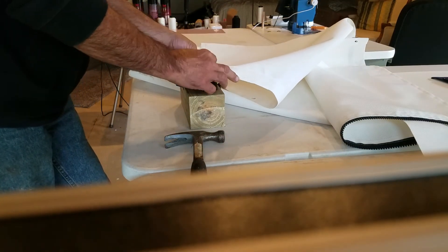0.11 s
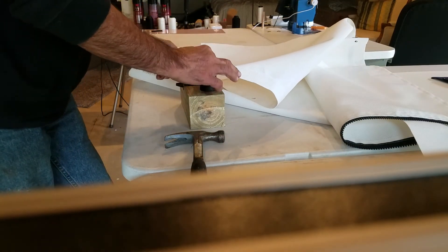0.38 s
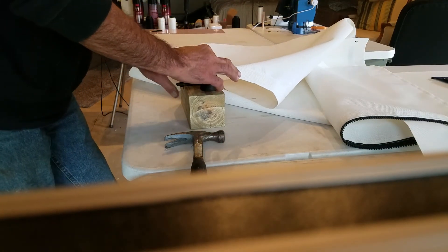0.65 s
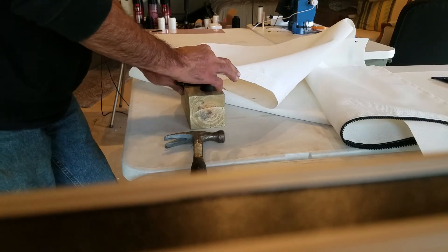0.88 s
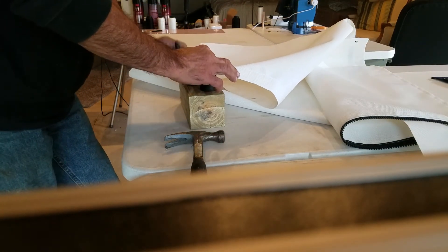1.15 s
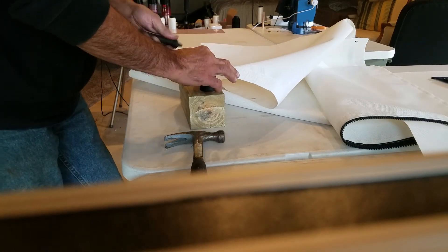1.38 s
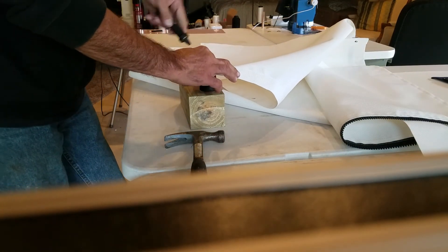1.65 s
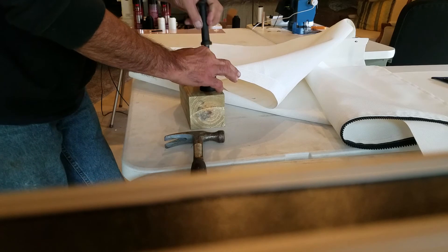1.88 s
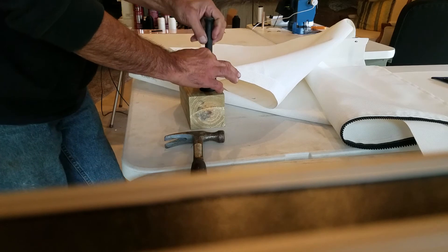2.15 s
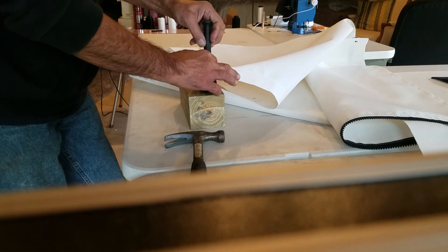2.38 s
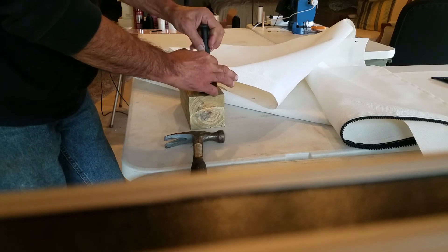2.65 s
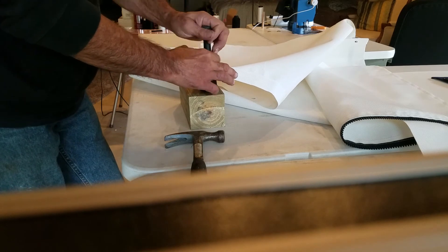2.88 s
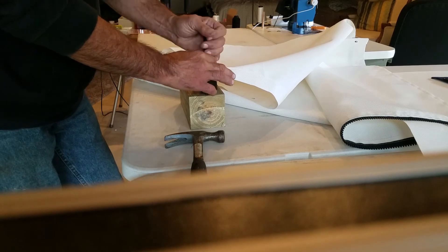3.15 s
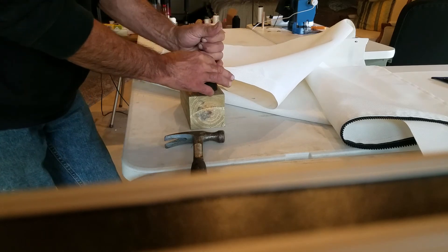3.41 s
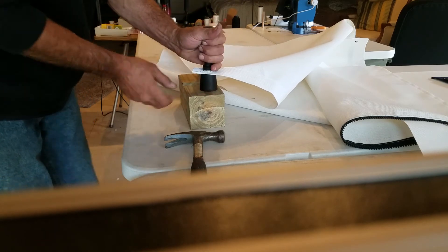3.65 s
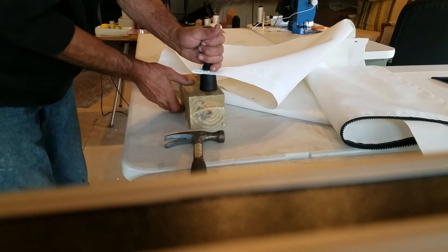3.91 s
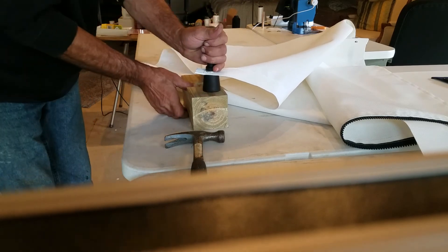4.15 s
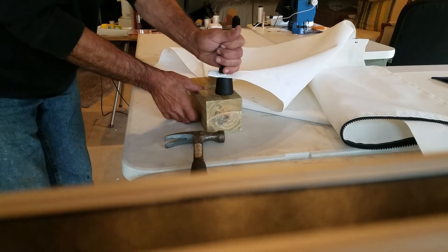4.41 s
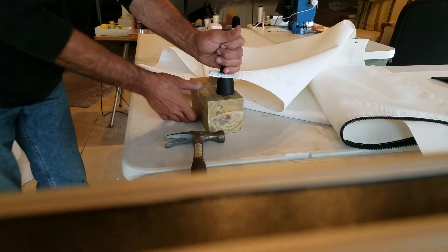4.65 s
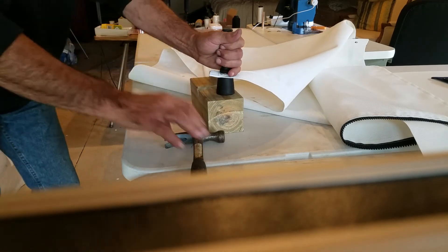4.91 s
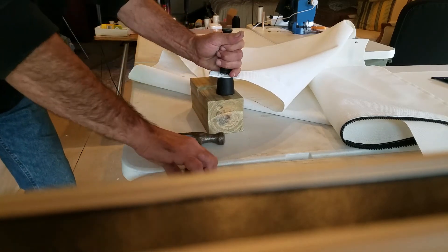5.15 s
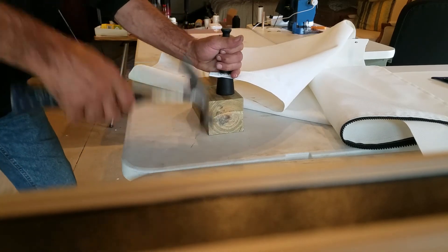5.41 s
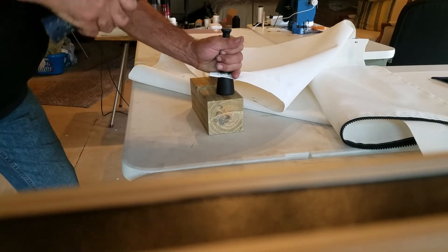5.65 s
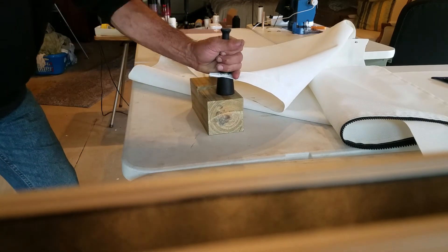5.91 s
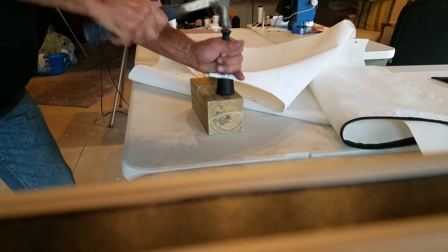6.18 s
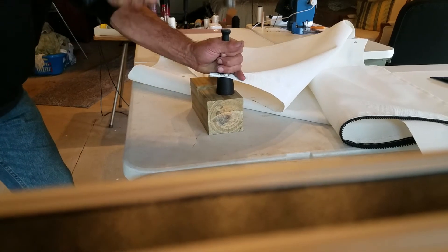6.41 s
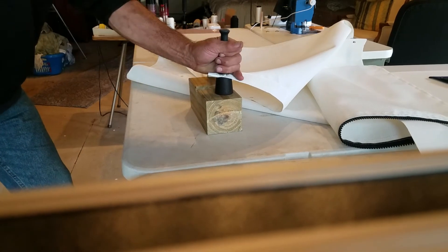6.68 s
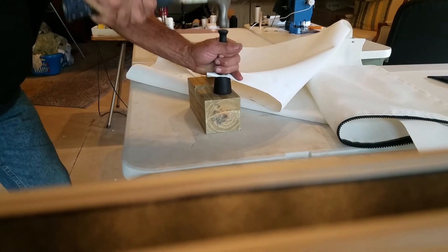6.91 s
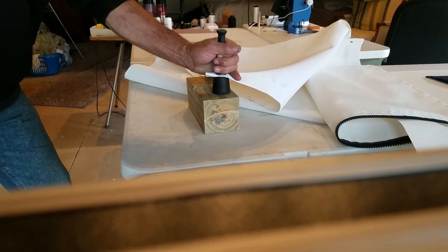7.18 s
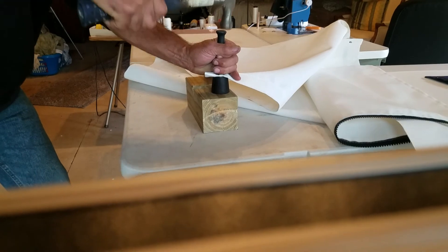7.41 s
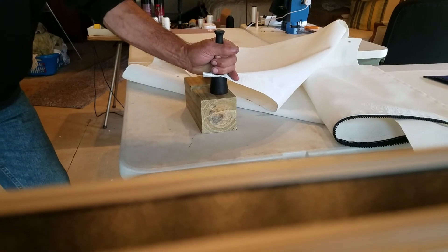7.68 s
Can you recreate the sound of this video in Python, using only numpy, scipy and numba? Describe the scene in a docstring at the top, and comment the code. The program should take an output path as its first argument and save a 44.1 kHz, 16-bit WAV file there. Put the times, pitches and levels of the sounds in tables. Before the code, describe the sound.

Faint hiss and small dull taps first, with gentle cloth rustling; then fuller wooden knocks with tiny metallic ticks as tools are placed on a block. Scraping, a brief squeak and hammer-grabbing clatter follow. A near-silent gap, then three explosive hammer hits on steel: bright ping, sharp crack, block bouncing and table rattling. The first overloads the nearby microphone; the next two have less steel ring. Short diffuse indoor reverberation.

```python
"""A hammer strikes a steel setter three times: damped steel modes ring, and lumpy noise bursts and wood modes
follow as the block slams and rattles on the table. Before that, hands set a grommet die on the wooden block,
lower the setter, slide the block and pick up the hammer: taps and catches wake block modes, rough noise makes
the rubbing, the table's shudder and the rustling, gliding tones squeak. A diffuse tail is the room, steady
noise its air. The recorder clips the first blow and turns its gain down."""
import sys
import numpy as np
from scipy import signal
from scipy.fft import rfft, irfft
from scipy.io import wavfile
from numba import njit

SR = 44100
rng = np.random.default_rng(int(sys.argv[2]) if len(sys.argv) > 2 else 0)


def waveform_to_disk(signal):
    """Save audio, clipped to [-1, 1], as 16-bit WAV at the path in sys.argv[1]."""
    frames = np.transpose(np.atleast_2d(signal))
    scaled = np.clip(frames, -1, 1) * 32767
    samples = np.round(scaled).astype(np.int16)
    wavfile.write(sys.argv[1], SR, samples)


def undo_db(level):
    """Turn decibels back into plain size, where 20 dB means ten times bigger."""
    steps = np.asarray(level, float) / 20
    return 10 ** steps


N = 343980
T = np.arange(N) / SR  # s

# Hammer head and setter modes. Each row: frequency in Hz, relative level in dB, t60 in seconds.
STEEL_MODES = [(10135, 1, 0.037), (5979, -10, .2), (5449, -19, .35), (8888, -12, 0.06), (7340, -5, 0.026),
               (1541, -7, 0.09), (5100, -11, .06), (1950, -12, .07)]
# Block and table top modes, as slammed. Each row: frequency in Hz, relative level in dB, t60 in seconds.
BLOCK_MODES = [(147.5, -8, 0.31), (212, -5.5, 0.12), (280, -7, .15), (357.5, 9, 0.076), (469.5, 4, 0.097),
               (562, -1, 0.14), (764.5, 6.5, 0.081), (819, 3, 0.087), (995, 2, 0.13), (1100, 0, .1),
               (1234, -1, 0.17), (1550, -13, 0.066), (1851.9, -10, .06), (2520, 2, 0.034)]
# Frame modes. Each row: frequency in Hz, relative level in dB, t60 in seconds.
FRAME_MODES = [(1125, -15, 1.2), (1981, -10, .8), (2500, -2, .45), (3564, -8, 1.4), (5452, 2, .45),
               (5982, 2, .45)]
# How hard each strike shakes the frame: peak level in dB.
FRAME_PEAK_DB = [-34, -31, -29]
# Spectrum of the rattle on the table. Each row: frequency in Hz, relative level in dB.
RATTLE_SPECTRUM = [(35, -46), (60, -38.5), (107, -16), (142, -8), (201, -10.5), (350, 0.5), (497, -7.5),
                   (545, -5), (930, -9), (997, -1.5), (1450, -10), (2000, -11.5), (3920, -19),
                   (7690, -12.5), (11500, -32), (15400, -38)]
# Hammer meets setter. Each row: start in seconds, steel ring in dB, crack in dB, block slam in dB,
# rattle t60 in seconds.
STRIKES = [(6.180, 5.5, -2, -8.5, 0.1), (6.758, -15, -20, -24.5, 0.082), (7.333, -15.5, -15.5, -27, 0.15)]
# Block bounces back onto the table. Each row: start in seconds, steel ring in dB, crack in dB,
# block slam in dB, rattle t60 in seconds.
BOUNCES = [(6.192, -24, -6, -10, 0.28), (6.211, -17.5, -9.5, -17, .2), (6.230, -29.5, -12.5, -10.5, 0.22),
           (6.770, -25.5, -8.5, -15, 0.21), (6.786, -17, -11.5, -7.5, 0.33), (6.806, -23, -12, -12.5, 0.39),
           (7.352, -18, -7.5, -10.5, 0.24), (7.363, -30, -8, -9.5, 0.38), (7.380, -35, -9.5, -10.5, 0.36)]
# Tool and block set down, tapped, or catching roughly as they drag. Each row: start in seconds,
# wood peak in dB, pitch in Hz, click in dB against the wood, bright tick in dB against the wood.
KNOCKS = [(0.255, -48, 556, -0.5, -17), (0.528, -62, 390, -7.5, -2), (0.724, -62, 401, -6, 1),
          (0.932, -55.5, 393, -10, -3), (1.083, -44, 450, -16, -22), (1.456, -63.5, 377, 4.5, 20.5),
          (1.467, -67, 229, -5, 25), (2.236, -33, 750, -35, -25.5), (2.250, -42, 260, -40, -22),
          (2.269, -44, 780, -28, -24.5), (2.324, -32.5, 807, -22, -16.5), (2.340, -32, 210, -33, -22),
          (2.355, -30, 790, -23, -27.5), (2.389, -35, 225, -27, -27), (2.555, -44.5, 449, -28, -14),
          (2.593, -42.5, 315, -29, -31), (2.81, -46, 750, -31, -20), (2.828, -44, 220, -25, -21),
          (2.962, -44.5, 225, -24, -22), (3.26, -48.5, 487, 2.5, -5.5), (3.770, -31.5, 410, -10.5, -14.5),
          (3.808, -36.5, 395, -9.5, -12.5), (3.968, -29, 490, -5, -10.5), (4.618, -44.5, 513, 3, -10.5),
          (4.664, -47, 2300, -2, -9), (5.046, -29.5, 840, -13, -19.5), (5.078, -35.5, 476, -5.5, -9.5),
          (5.256, -33, 477, -10, -18), (5.281, -29, 536, -6, -8), (5.299, -30.5, 455, -3, -9.5),
          (5.536, -66, 280, -11, 11.5), (5.556, -65, 686, -11, 7.5), (5.629, -65.5, 369, -6.5, 1),
          (5.73, -59.5, 242, -3, -3)]
# Click spectrum of a knock. Each row: frequency in Hz, relative level in dB.
CLICK_SPECTRUM = [(200, -50), (600, -10.5), (1300, 2.5), (2600, -5.5), (4500, -19.5), (12000, -41.5)]
# Small metal parts that ring faintly. Each row: start in seconds, frequency in Hz, peak in dB, t60 in seconds.
TINKS = [(0.932, 2440, -68, .5), (1.075, 5103, -66, 0.32), (1.641, 5450, -77, 1), (2.237, 5400, -72, 0.102),
         (2.325, 5400, -56.5, 0.093), (2.332, 2960, -57, 0.33), (4.62, 2100, -56, 0.15),
         (4.655, 2695, -64, 0.15)]
# Spectra of thud, rumble, scrape and hiss, in turn. Each row: frequency in Hz, relative level in dB.
RUB_SPECTRA = [
    [(30, -23.5), (70, -1), (120, 8), (220, -18), (600, -57.5)],
    [(100, -24.5), (200, -7), (400, 2), (650, -8.5), (1200, -20.5), (3000, -63.5)],
    [(100, -49.5), (350, -19), (700, 5), (1500, 2), (2600, -0.5), (4500, -17), (12000, -45)],
    [(500, -47.5), (1800, -14), (3500, -3), (6000, -3), (7600, 6.5), (9500, -6), (12000, -16), (15000, -13)],
]
# Rubbing over wood, and the table's shudder dying away after a tap. Each row: loudest moment in seconds,
# table rumble in dB, thud in dB against it, scrape in dB against it, rise in seconds per 20 dB.
WOOD_SWELLS = [(.544, -76, -18, 0, 0.3), (.654, -69.5, -7, -16, .3), (.80, -82.5, 1, 1, .3),
               (.872, -70, -12, -4, 0.086), (1.0, -69, -3, -3, 0.24), (1.062, -47.5, -15.5, -14.5, .053),
               (2.42, -57, -11, -13, .03), (2.598, -56.5, -18, -17.5, .3),
               (2.874, -62.5, -1.5, -17.5, 0.029), (3.02, -65, -3.5, -14, .05),
               (3.3, -62.5, -24, -5.5, .03), (3.45, -67, -17, -2.5, .3), (3.607, -61.5, -29, 2, 0.185),
               (3.73, -72, -8.5, -5, 0.12), (3.839, -49.5, -26, -3, 0.049), (4.02, -52.5, -15, -2, .04),
               (4.19, -63, -17, 6.5, 0.25), (4.30, -52, -9, 3, .3), (4.44, -57.5, -6.5, 5, .5),
               (4.699, -61.5, -23, -3.5, 0.088), (4.9, -72, -11, 3, 0.53), (5.031, -61.5, 6, -5, .06),
               (5.1, -51, -15, 0.5, 0.053), (5.19, -48, -6.5, -2, .15), (5.279, -40.5, -10, 0.5, .09),
               (5.738, -70.5, -7, -2.5, 0.034)]
# Fabric rustles. Each row: loudest moment in seconds, hiss in dB, rise and fall in seconds per 20 dB.
RUSTLES = [(.544, -72.5, 0.17, 0.15), (.87, -70.5, 0.35, .9), (1.062, -63.5, 0.174, 0.13),
           (1.38, -74.5, 0.28, 0.69), (1.55, -71, 0.058, .06), (1.74, -79, 1, .8), (2.42, -78, 0.036, 0.15),
           (2.598, -72, 0.27, 0.16), (2.785, -69.5, 0.1, 0.19), (3.1, -70.5, 0.13, 0.17),
           (3.35, -73.5, 0.39, .6), (3.606, -62.5, 0.28, 0.13), (3.9, -62, 0.23, 0.46),
           (4.29, -54.5, 0.61, 0.42), (4.7, -68, 0.12, 0.072), (4.95, -68.5, 1.1, 0.1),
           (5.09, -55.5, 0.1, 0.15), (5.298, -40, 0.079, 0.085), (5.55, -71, .5, .8), (5.9, -81, .9, 0.96)]
# Sliding parts squeak. Each row: start in seconds, length in seconds, first Hz, last Hz,
# level in dB ahead of the stutter.
SQUEAKS = [(2.55, 0.12, 4400, 4700, -74), (2.8, .12, 4200, 3980, -77), (2.96, .12, 4280, 4520, -80),
           (4.372, .13, 1530, 1450, -47.5)]
# Air and hiss spectrum. Each row: frequency in Hz, relative level in dB per Hz.
AIR_SPECTRUM = [(24, -29), (40, -8), (123, -3.5), (154, -13), (192, -2), (241, -8.5), (521, -4.5),
                (652, -7.5), (971, -7.5), (1070, -10.5), (1450, -11), (5420, -20), (15400, -21)]
# Room decay. Each row: frequency in Hz, t60 in seconds.
ROOM_T60 = [(70, 0.88), (140, 0.479), (280, 0.41), (560, 0.39), (1100, 0.34), (2200, 0.4516), (4400, 0.4),
            (8800, 0.3193), (15000, 0.24)]
# Side filter. Each row: frequency in Hz, gain in dB.
SIDE_GAIN = [(60, -6.5), (110, -11), (200, -8), (380, -5), (700, -1.5), (1290, 0.5), (2380, 0.5),
             (4400, 1.5), (8120, 4), (15000, 0)]

AIR_DB = -71
ROOM_DB, ROOM_RISE_S = -7, 0.0076
STEEL_TO_ROOM_DB = -4.5
SIDE_SHIFT_SAMPLES, SIDE_SHARE = 3, 0.39
HANDS_PAN_DB = 1.1  # left over right
BASS_CUT_HZ = 110
HELD_T60_RATIO = 0.39  # knocked against slammed block
SPOT_DB_PER_OCTAVE_SQUARED = 37  # loss of a mode away from the knock's pitch
CHATTER_T60_S, TICK_T60_S = 0.135, 0.077
WOOD_FALL_S_PER_20_DB = 0.1
GRIT_DB, PATCH_DB, PATCH_SAMPLES = 0.58, 2.3, 400
SQUEAK_RISE_SHARE, SQUEAK_STUTTER_S = 0.23, 0.0027  # share of length; time between slips of new strength
LUMP_DB, LUMP_S = 3, 0.004  # the rattle is a run of uneven little contacts
WIDE_DB = -6.5  # side rattle against the crack
OFFSET = -0.0004


def shape(hz, points):
    """Gain of (Hz, dB) points, straight on a log-frequency axis."""
    p = np.array(points, float)
    return undo_db(np.interp(np.log(np.maximum(hz, 1)), np.log(p[:, 0]), p[:, 1]))


def colour(x, points):
    """Causal minimum-phase filter with the given spectrum; rms 1 for white input."""
    size = 4096
    cepstrum = irfft(np.log(shape(np.fft.rfftfreq(size, 1 / SR), points)))
    cepstrum[1:size // 2] *= 2
    cepstrum[size // 2 + 1:] = 0
    h = irfft(np.exp(rfft(cepstrum)))
    return signal.fftconvolve(x, h / np.sqrt(np.sum(h ** 2)))[:len(x)]


def decay(t, t60):
    """Exponential loss of 60 dB per t60."""
    return np.exp(-np.log(1000) * t / t60)


def fade(t60):
    """Decay envelope, at most a second long."""
    return decay(T[:min(int(SR * t60 * 1.2) + 2, SR)], t60)


def ring(modes, scatter_db):
    """Damped modes to peak 1, each blow exciting them a little differently."""
    t = T[:len(fade(max(mode[-1] for mode in modes)))]
    out = 0
    for (hz, db, t60), z in zip(modes, rng.standard_normal(len(modes))):
        out = out + undo_db(db + scatter_db * z) * np.sin(2 * np.pi * hz * t) * decay(t, t60)
    return out / np.abs(out).max()


def burst(points, t60):
    """Coloured noise that dies away."""
    envelope = fade(t60)
    return colour(rng.standard_normal(SR)[:len(envelope)] * envelope, points) / 2


def add(out, start_s, x):
    """Mixes x into out at start_s."""
    i = int(start_s * SR)
    out[i:i + len(x)] += x[:N - i]


def stereo(mid, side):
    """The ports hear the bass alike and the treble apart."""
    side = irfft(rfft(side) * shape(np.fft.rfftfreq(len(side), 1 / SR), SIDE_GAIN), len(side))
    return np.array([mid + side, mid - side])


def air():
    """Steady workshop air and microphone hiss."""
    return undo_db(AIR_DB) * stereo(*(colour(rng.standard_normal(N), AIR_SPECTRUM) for _ in range(2)))


def knocks():
    """A tap or catch chatters for a moment, waking the modes near its spot, and ticks; small parts ring on."""
    out = np.zeros(N)
    for start_s, db, pitch_hz, click_db, tick_db in KNOCKS:
        near = []
        for hz, mode_db, t60 in BLOCK_MODES:
            loss_db = SPOT_DB_PER_OCTAVE_SQUARED * np.square(np.log2(hz / pitch_hz))
            near.append((hz, mode_db - loss_db, t60 * HELD_T60_RATIO))
        envelope = fade(CHATTER_T60_S)
        chatter = envelope * rng.standard_normal(SR)[:len(envelope)]
        chatter[0] = 16.07  # the first contact is the hardest
        # each knock sounds thin below its pitch
        thin = signal.butter(2, 0.6 * pitch_hz, "high", fs=SR, output="sos")
        body = signal.sosfilt(thin, signal.fftconvolve(chatter, ring(near, 2.7)))
        add(out, start_s, undo_db(db) * body / np.abs(body).max())
        add(out, start_s, undo_db(db + click_db) * burst(CLICK_SPECTRUM, CHATTER_T60_S))
        add(out, start_s, undo_db(db + tick_db) * burst(RUB_SPECTRA[-1], TICK_T60_S))
    for start_s, hz, db, t60 in TINKS:
        add(out, start_s, undo_db(db) * ring([(hz, 0, t60)], 0))
    return out


def direct(x):
    """Sound from one side reaches the left port a little earlier."""
    return stereo(x, SIDE_SHARE * (np.roll(x, -SIDE_SHIFT_SAMPLES) - np.roll(x, SIDE_SHIFT_SAMPLES)))


def room(x):
    """A diffuse tail, each frequency band dying at its own rate."""
    t, hz = T[:SR], np.fft.rfftfreq(SR, 1 / SR)
    noise = rfft(rng.standard_normal((2, SR)))
    tails = 0
    centres = np.log(np.array(ROOM_T60)[:, 0])
    for k, (_, t60) in enumerate(ROOM_T60):
        share = np.interp(np.log(np.maximum(hz, 1)), centres, np.arange(len(centres)) == k)
        tails = tails + irfft(noise * share) * decay(t, t60)
    tails = tails * (1 - np.exp(-t / ROOM_RISE_S))
    tails *= undo_db(ROOM_DB) / np.sqrt(np.mean(np.sum(tails ** 2, axis=1)))
    return stereo(*(signal.fftconvolve(x, tail)[:N] for tail in tails))


def swell(peak_s, db, rise_s, fall_s):
    """Gain that climbs to a peak and drops again, straight in dB."""
    return undo_db(db - 20 * np.maximum((peak_s - T) / rise_s, (T - peak_s) / fall_s))


def rubbing():
    """Dense noise of uneven size: rubbing over wood, the table's shudder after a tap, rustling cloth."""
    patches = np.repeat(rng.standard_normal(N // PATCH_SAMPLES + 1), PATCH_SAMPLES)[:N]
    grit = undo_db(GRIT_DB * rng.exponential(size=N)) * undo_db(PATCH_DB * patches)
    grit /= np.sqrt(np.mean(grit ** 2))
    wood = np.zeros((3, N))  # power of thud, rumble, scrape
    for peak_s, db, thud_db, scrape_db, rise_s in WOOD_SWELLS:
        gains = undo_db(np.array([thud_db, 0, scrape_db]))
        wood += np.outer(gains, swell(peak_s, db, rise_s, WOOD_FALL_S_PER_20_DB)) ** 2
    cloth = sum(swell(*row) ** 2 for row in RUSTLES)
    out = np.zeros(N)
    for power, spectrum in zip([*wood, cloth], RUB_SPECTRA):
        out += np.sqrt(power) * colour(grit * rng.standard_normal(N), spectrum)
    return out


def squeaks():
    """Brief stick-slip tones that glide and stutter."""
    stutter = np.interp(T / SQUEAK_STUTTER_S, np.arange(5000), 0.51 + rng.standard_normal(5000))
    out = 0
    for start_s, length_s, first_hz, last_hz, db in SQUEAKS:
        hz = np.interp(T, [start_s, start_s + length_s], [first_hz, last_hz])
        phase = 2 * np.pi * np.cumsum(hz) / SR
        corners_s = start_s + length_s * np.array([0, SQUEAK_RISE_SHARE, 1])
        envelope = np.sqrt(np.interp(T, corners_s, [0, 1, 0]))
        out = out + undo_db(db) * envelope * np.sin(phase)
    return out * stutter


def rattle(t60):
    """A fading burst whose strength varies every few milliseconds."""
    x = burst(RATTLE_SPECTRUM, t60)
    lumps = np.interp(T[:len(x)] / LUMP_S, np.arange(1000), rng.standard_normal(1000))
    return x * undo_db(LUMP_DB * lumps)


def hammer():
    """Steel rings at the strike; the block jumps, slams back and everything on the table rattles."""
    steel, table, wide = np.zeros((3, N))
    for start_s, steel_db, crack_db, slam_db, t60 in STRIKES + BOUNCES:
        add(steel, start_s, undo_db(steel_db) * ring(STEEL_MODES, 0.9))
        add(table, start_s, undo_db(crack_db) * rattle(t60))
        add(wide, start_s, undo_db(crack_db + WIDE_DB) * rattle(t60))
        add(table, start_s, undo_db(slam_db) * ring(BLOCK_MODES, 1.1))
    for (start_s, *_), db in zip(STRIKES, FRAME_PEAK_DB):
        add(table, start_s, undo_db(db) * ring(FRAME_MODES, 1.5))
    return steel, table, wide


def scene():
    """Direct sound of blows and hands, plus room and air."""
    steel, table, wide = hammer()
    # the blows and hands carry little deep bass
    cut = signal.butter(2, BASS_CUT_HZ, "high", fs=SR, output="sos")
    blows = signal.sosfilt(cut, table)
    hands = signal.sosfilt(cut, knocks()) + rubbing() + squeaks()
    pan = undo_db(HANDS_PAN_DB * np.array([[0.5], [-0.5]]))
    near = direct(steel + blows) + stereo(0, wide) + direct(hands) * pan
    # the steel beams at the microphone, so the room gets less of it
    return near + room(undo_db(STEEL_TO_ROOM_DB) * steel + blows + hands) + air()


@njit
def follow(x, rise, fall):
    """Level follower, quick up and slow down."""
    out, e = np.empty(len(x)), 1e-9
    for i in range(len(x)):
        e += (x[i] - e) * (rise if x[i] > e else fall)
        out[i] = e
    return out


def roll_off(x):
    """The treble ends steeply here."""
    return signal.sosfilt(signal.butter(12, 15590, fs=SR, output="sos"), x)


def record(dry):
    """A small offset; gain control ducks fast at a blow and recovers over seconds; peaks clip at full scale."""
    attack_s, release_s, knee_db, squeeze = 0.07, 21.5, -7.5, 1.23
    level = follow(np.abs(dry).max(axis=0), 1 / (attack_s * SR), 1 / (release_s * SR))
    gain = np.minimum(1, (undo_db(knee_db) / level) ** squeeze)
    mix = np.clip((dry + OFFSET) * gain, -1, 1)
    return roll_off(mix)


dry = scene()
out = record(dry)
waveform_to_disk(out)
```